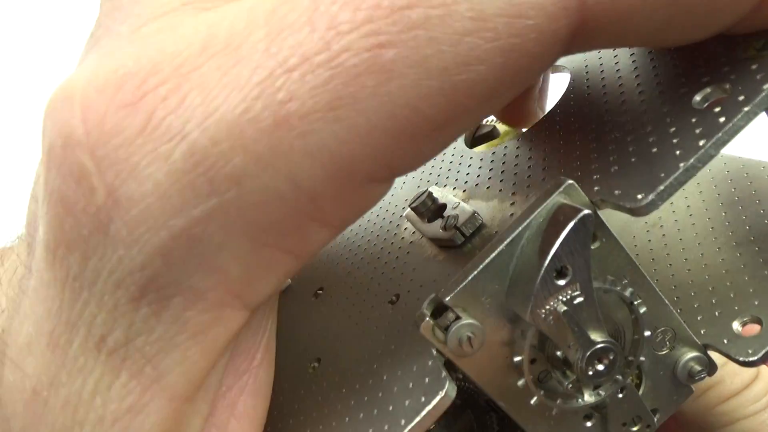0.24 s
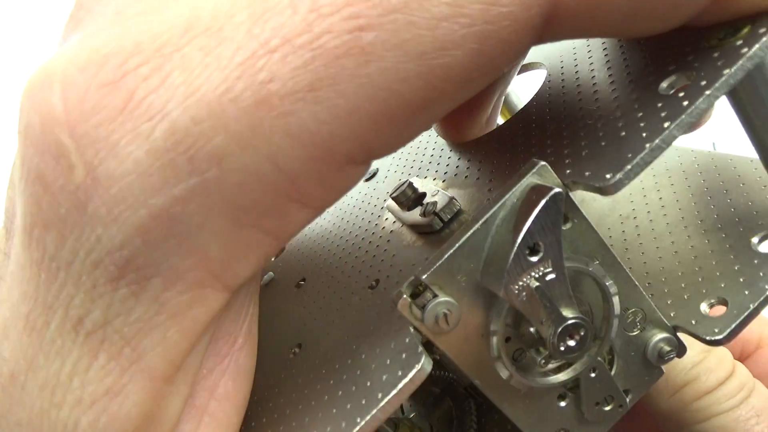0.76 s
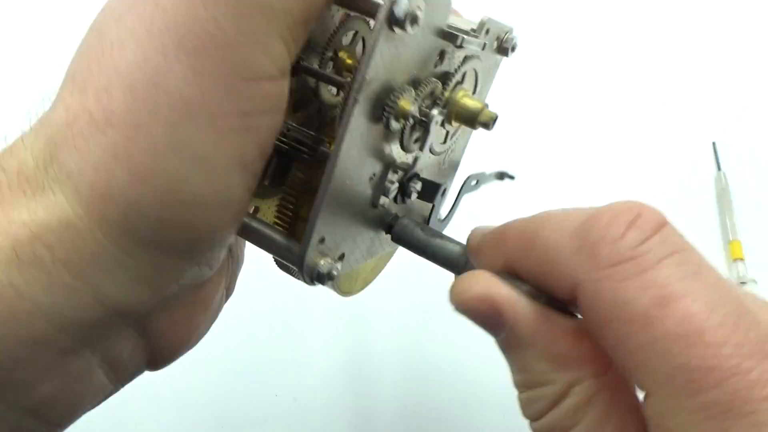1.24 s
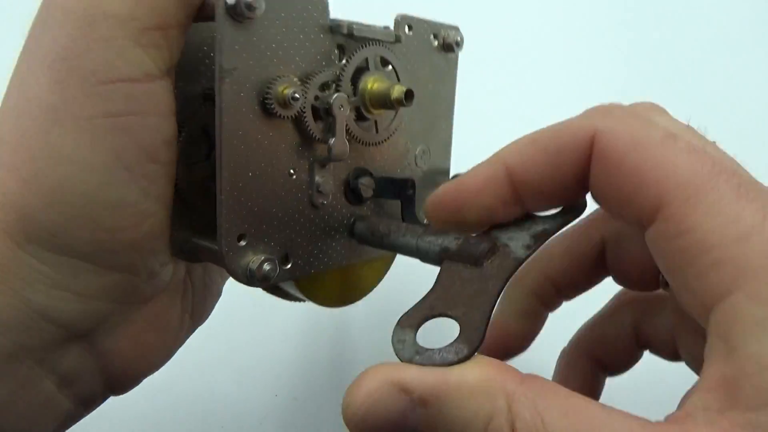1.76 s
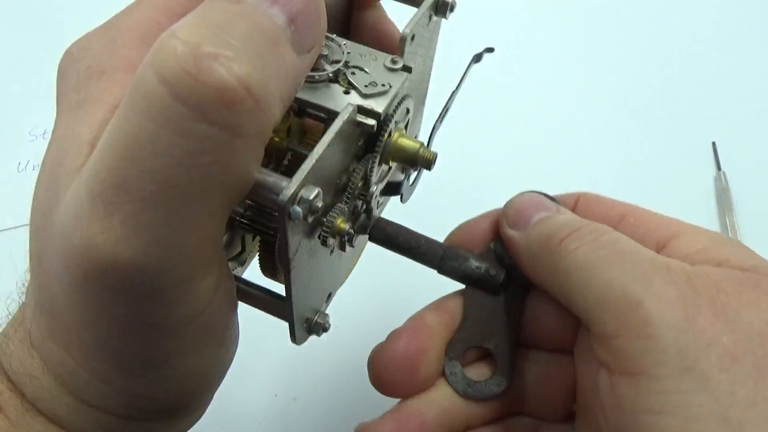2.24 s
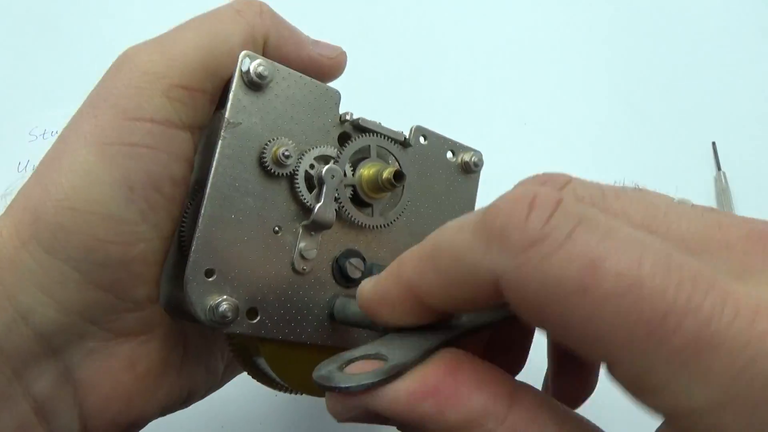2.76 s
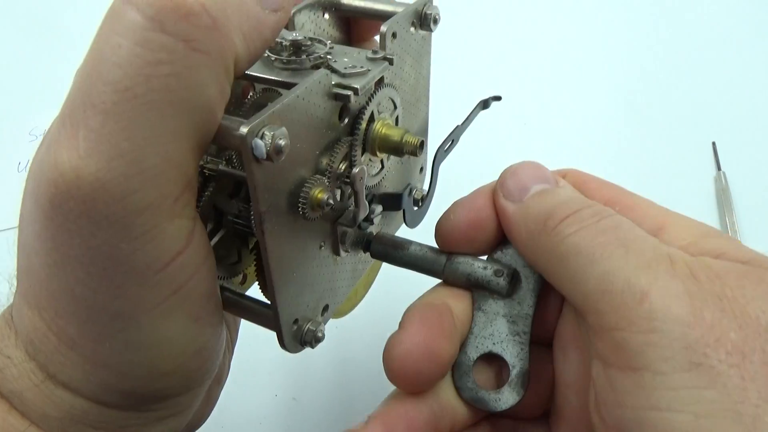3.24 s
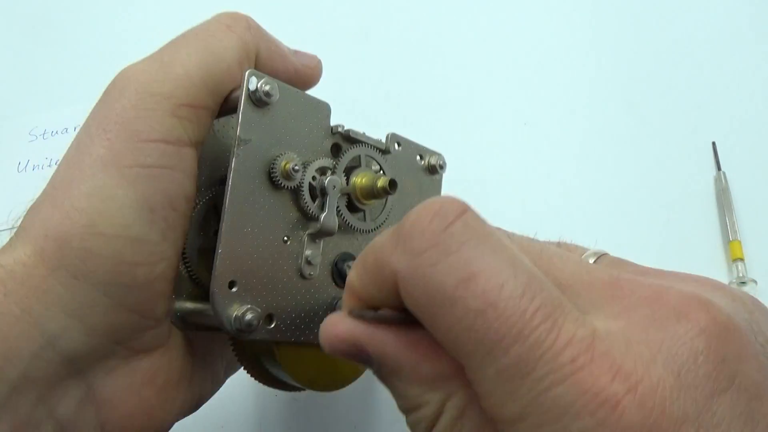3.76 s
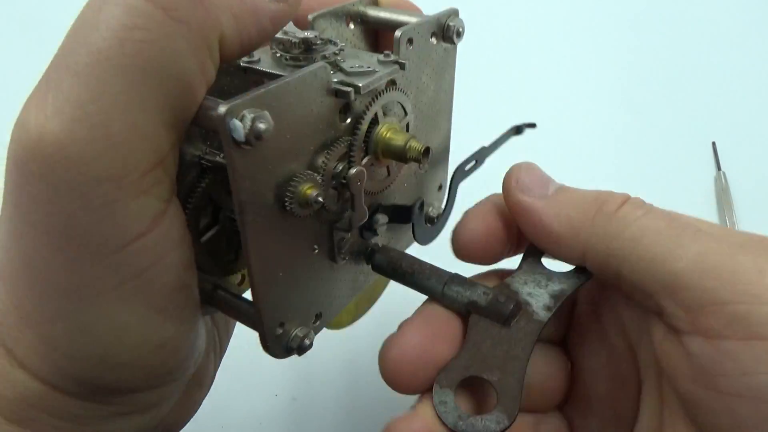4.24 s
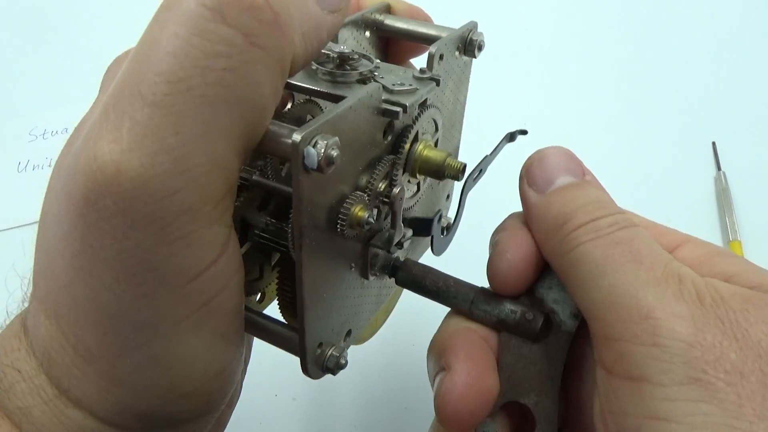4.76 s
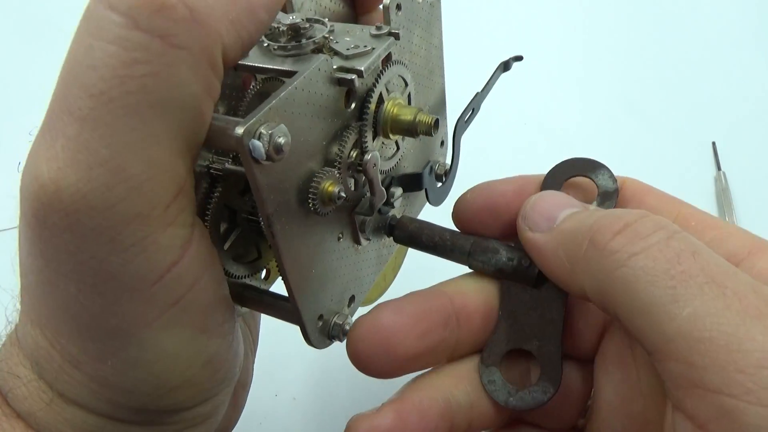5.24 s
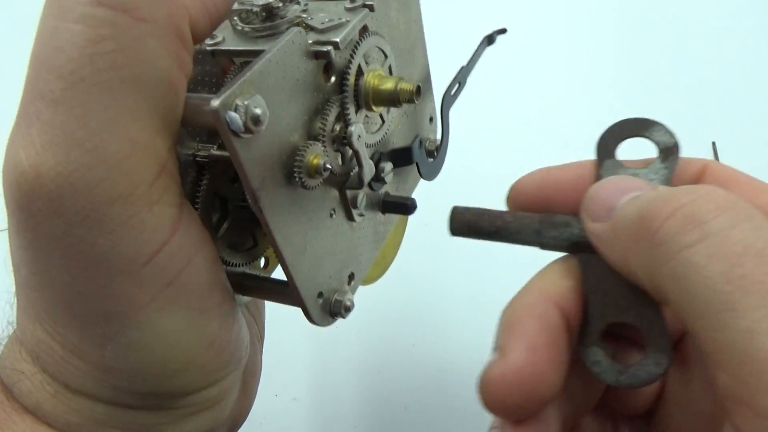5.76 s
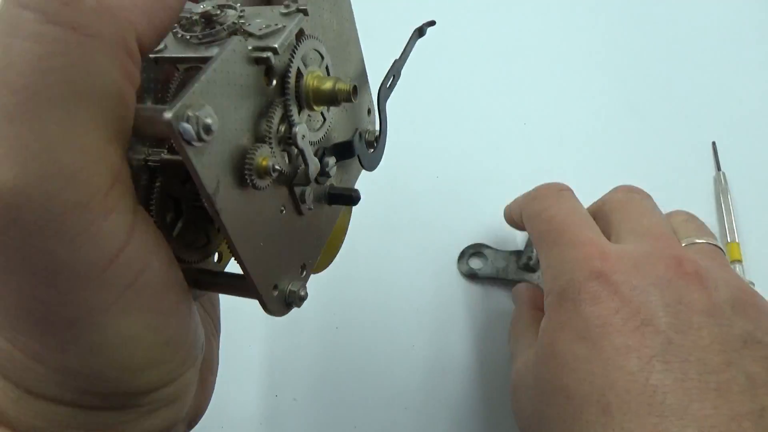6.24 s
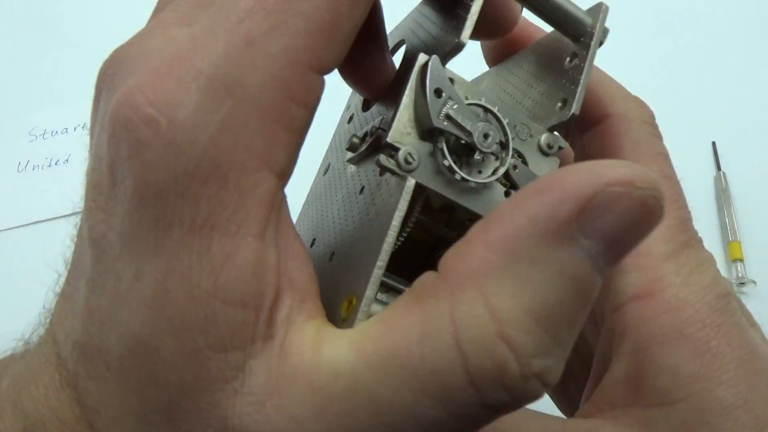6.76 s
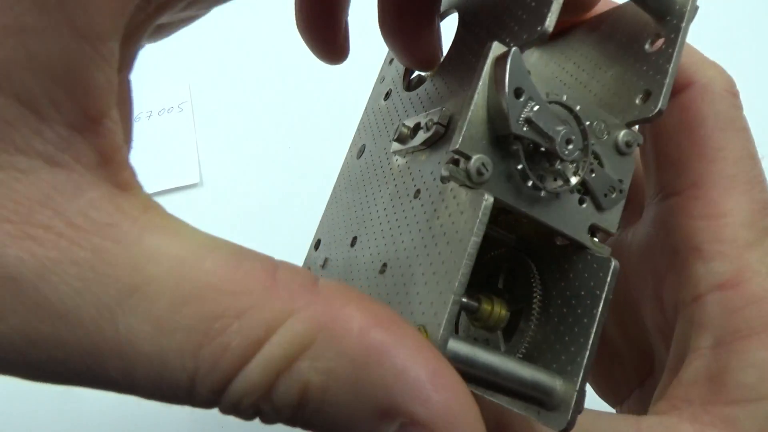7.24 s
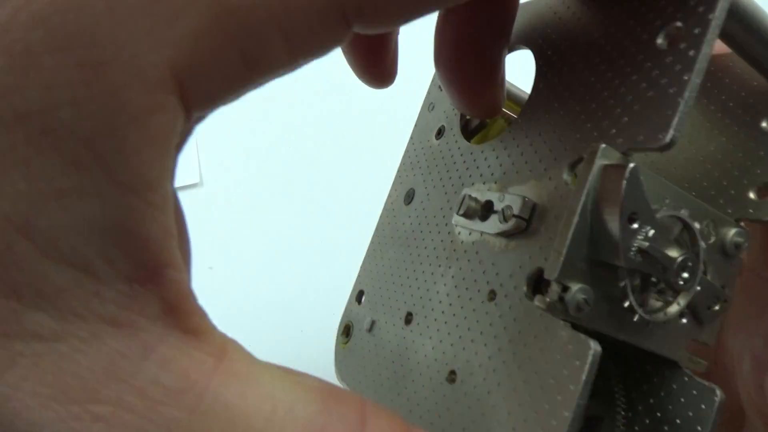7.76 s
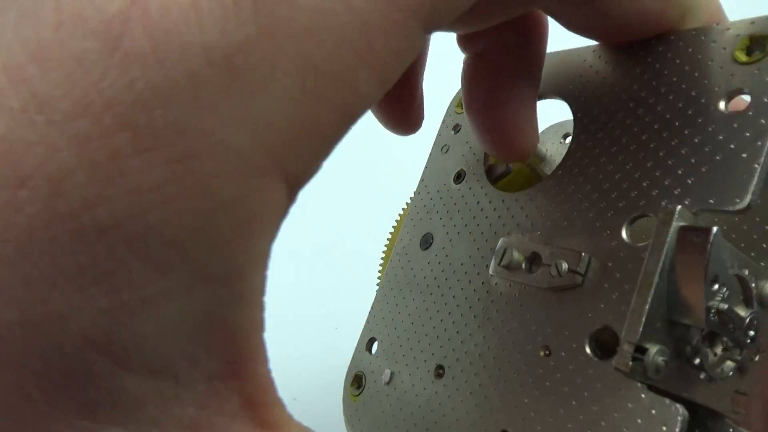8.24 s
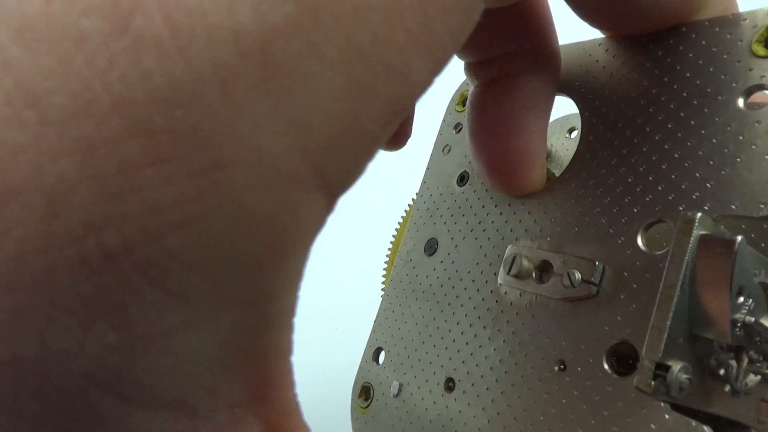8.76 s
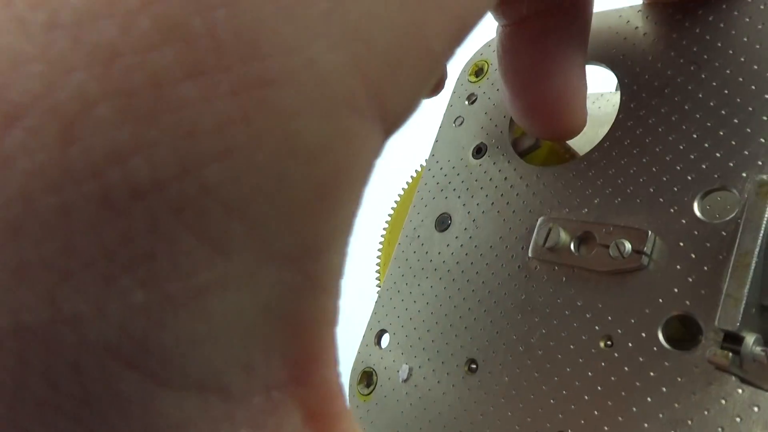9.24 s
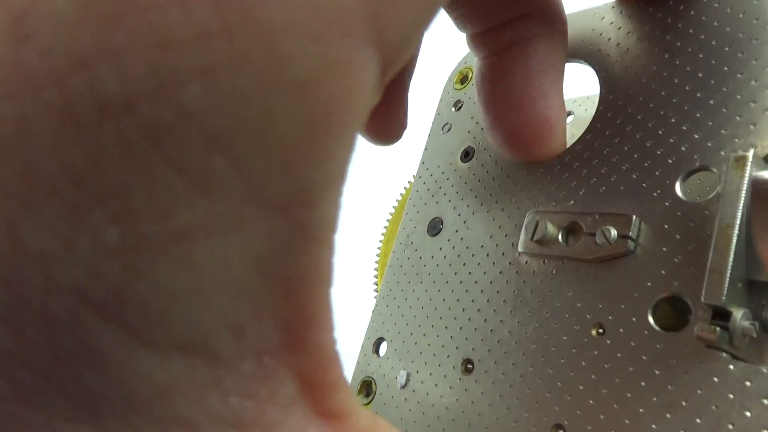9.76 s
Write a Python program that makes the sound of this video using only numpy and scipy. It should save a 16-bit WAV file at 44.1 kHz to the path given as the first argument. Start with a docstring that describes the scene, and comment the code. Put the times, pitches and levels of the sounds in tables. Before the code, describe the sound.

A small quiet room with soft hiss, faint hum and deep rumble; a spring-driven clock movement is held very close. From 0 to 4.9 s it ticks lightly and evenly, about five times a second. Five crisp ratchet clicks come between 0.1 and 0.7 s, with dull hand thuds. From 0.9 s fingers rub the plates; single ratchet clicks fall at 1.5, 2.0, 2.2 and 2.6, amid small irregular clicks, with sharper ones at 3.4. Strong snaps with a slight metallic ring occur at 4.35 to 4.7, then ratchet clicks every 0.15 s or so until 5.9. At 6.1 the key touches and drags on the wooden desk, landing with a loud double knock at 6.3, rattle and bright clinks dying away. A click at 6.6, a thin squeak at 6.9 and a click at 7.05 follow. After 8 s a low hum rises under sparse faint clicks, near 8.6, 9.0, 9.7 and 9.9.

```python
"""In a small quiet room that hums, hisses and rumbles, a spring-driven clock movement is held close to
the microphone. It ticks evenly for almost five seconds while ratchet and key click on the plates, hands
thud and fingers rub: bursts of noise in three bands, plate modes and a wash of dense modes.
After six seconds the key drags and knocks on a wooden desk, heard as ringing modes, rattle and clinks.
A finger squeaks near seven seconds; a few late clicks follow, and a low hum comes up after eight."""
import sys
import numpy as np
from scipy import signal
from scipy.fft import rfft, irfft
from scipy.io import wavfile
from scipy.ndimage import uniform_filter1d

SR = 44100
rng = np.random.default_rng(int(sys.argv[2]) if len(sys.argv) > 2 else 0)


def dump_mix(stems):
    """Bounce the given channels to the path in sys.argv[1] as a 16-bit WAV at rate SR."""
    frames = np.atleast_2d(stems).T  # one column per channel
    limited = np.clip(frames, -1, 1)  # hard clip at full scale
    pcm = np.round(limited * 32767).astype(np.int16)
    wavfile.write(sys.argv[1], SR, pcm)


N = 441000

# the ratchet pawl rides up a tooth and drops; band levels are relative, before the mix:
# drop_s [s], treble_db [dB], middle_db [dB], low_db [dB], chatter_ms [ms], ride_ms [ms],
# ride_below_drop_db [dB]
PAWL_DROPS = [(0.0797, -21, -30.5, -30.5, 2.7, 15, -29), (0.2222, -13, -22, -31, 1.3, 35.3, -14.5),
              (0.3621, -17.5, -27.5, -30.5, 2.2, 34.7, -13), (0.5297, -12, -14, -26, 0.83, 28.4, -21.5),
              (0.6774, -13.5, -22.5, -29.5, 1.3, 44, -25.5), (1.4907, -12, -19.5, -34.5, 2.1, 26, -25.5),
              (1.954, -12.5, -31, -20.5, 2.4, 40, -20), (2.2243, -23.5, -33, -35, 7.5, 39, -12.5),
              (2.6143, -17.5, -27, -42, 1.2, 52, -26), (4.2154, -21, -29, -36.5, 3.2, 8.3, -23.5),
              (4.5016, -17.5, -25, -29, 5.8, 48, -25.5), (4.6911, -11, -13, -21, 4.9, 14, -28),
              (4.8953, -14, -22, -32.5, 4.9, 24.7, -20.5), (5.0328, -19.5, -28.5, -27.5, 2.1, 24.7, -15.5),
              (5.2089, -17.5, -27, -36.5, 3.4, 28, -15.5), (5.3462, -16, -26.5, -31, 6.2, 29, -19.5),
              (5.5275, -18, -22, -53, 5.4, 26, -10.5), (5.6637, -10, -23, -30, 4.2, 22, -23.5),
              (5.7635, -28.5, -44, -36.5, 2.8, 30, -6.5), (5.8735, -15.5, -30, -34.5, 3.6, 27, -18),
              (8.6378, -22.5, -31, -30.5, 3.9, 28.4, -19), (9.6984, -23.5, -26, -33.5, 2.7, 25, -30)]


def amp(db):
    """dB to gain."""
    return 10 ** (np.asarray(db) / 20)


def in_time(rows):
    """Columns of a curve, drawn straight between its points, one value a sample."""
    s, *columns = np.transpose(rows)
    return [np.interp(np.arange(N) / SR, s, column) for column in columns]


def filtered(x, order, hz, kind):
    """Butterworth filter along the last axis."""
    return signal.sosfilt(signal.butter(order, hz, kind, fs=SR, output="sos"), x)


def band(x, lo_hz, hi_hz):
    """Band-pass that keeps the rms of white noise near 1."""
    return filtered(x + 1e-18, 2, [lo_hz, hi_hz], "band") / np.sqrt(2 * (hi_hz - lo_hz) / SR)


def coloured(x, spectrum):
    """Shape noise by a spectrum drawn over log frequency; overall rms 1."""
    hz, db = np.transpose(spectrum)
    bins_hz = np.arange(x.shape[-1] // 2 + 1) * SR / x.shape[-1] + 1
    gain = amp(np.interp(np.log(bins_hz), np.log(hz), db))
    out = irfft(rfft(x) * gain, x.shape[-1])
    return out / np.sqrt(np.mean(out ** 2))


def ring(x, modes):
    """Each mode is a two-pole resonator set ringing by x at its level; signs alternate."""
    out = 0
    for k, (hz, db, t60_s) in enumerate(modes):
        r = amp(-60 / (t60_s * SR))
        w = 2 * np.pi * hz / SR
        mode = signal.lfilter([0, amp(db) * np.sin(w)], [1, -2 * r * np.cos(w), r * r], x + 1e-18)
        out = out + (-1) ** k * mode
    return out


def dying(x, t60_s):
    """Countless echoes: x through decaying noise of energy 1, different on each side."""
    fall = amp(-60 * np.arange(int(SR * .8)) / SR / t60_s)
    tail = rng.standard_normal((2, len(fall))) * fall / np.sqrt(np.sum(fall ** 2))
    return signal.fftconvolve(x * np.ones((2, 1)), tail, axes=1)[:, :N]


def taps(rows):
    """A single-sample click for each (s, dB)."""
    out = np.zeros(N)
    for s, db in rows:
        out[int(s * SR)] += amp(db)
    return out


def widen(mid, side):
    """Left and right from a centre and a side signal."""
    return mid + side * [[1], [-1]]


def stroke(start_s, end_s, band_db, ease):
    """Force of one sliding contact in three bands; ease is the share spent starting and stopping."""
    a, b = int(start_s * SR), int(end_s * SR)
    out = np.zeros((3, N))
    out[:, a:b] = amp(band_db)[:, None] * signal.windows.tukey(b - a, ease)
    return out


def room_hiss():
    """Room and microphone hiss: noise shaped by a spectrum, with a band-limited side signal."""
    # hiss spectrum: frequency_hz [Hz], density_db [dB per Hz, relative]
    hiss_spectrum = [(15, -49), (25, -14.5), (58, -18), (87, -19), (149, -5.5), (242, -9), (293, -11),
                     (734, -13), (1370, -14.5), (1890, -20), (16000, -27.5)]
    mid, side = coloured(rng.standard_normal((2, N)), hiss_spectrum)
    side = filtered(side, 1, [150, 9000], "band")
    return amp(-61.5) * widen(mid, amp(-4.5) * side)


def distant_hum():
    """Distant machines: narrow bands of noise, which waver by themselves."""
    # hums: centre_hz [Hz], width_hz [Hz], level_db [dB]
    hums = [(118.8, 5.6, -68.5), (203.2, 5.7, -73.5), (306, 14, -76), (1380, 9.2, -80)]
    out = 0
    for hz, width_hz, db in hums:
        out = out + amp(db) * band(rng.standard_normal(N), hz - width_hz / 2, hz + width_hz / 2)
    return out


def rumble():
    """Deep rumble through desk and stand: low noise, band-passed twice, under a level curve."""
    # rumble level before the rescaling below: time_s [s], level_db [dB]
    rumble_curve = [(0.0, -66.5), (0.11, -69), (3.54, -61.5), (3.73, -69.5), (4.84, -62.5), (5.85, -68),
                    (6.15, -49.5), (6.71, -63.5), (7.38, -80), (7.58, -57.5), (8.36, -77), (10.0, -73.5)]
    level_db, = in_time(rumble_curve)
    low = band(band(rng.standard_normal(N), 39, 63), 30.6, 68.7)
    return amp(level_db) * low * np.sqrt(60 / SR)    # takes back most of the second band's gain


def escapement():
    """Rows of clicks: an even beat with slight jitter, each tick led by a softer unlocking."""
    # tick loudness as the movement is turned about: time_s [s], treble_db [dB, relative]
    tick_curve = [(0, -20.5), (.82, -22.5), (1.22, -26), (1.82, -25), (2.02, -21.5), (2.82, -28),
                  (4.42, -27), (4.82, -50)]
    beat_s, first_s, last_s, jitter_s = .2001, .0216, 4.9, .0007
    unlock_lead_s, unlock_db, spread_db = .0165, -12, 3.5
    s = np.arange(first_s, last_s, beat_s)
    chance = rng.standard_normal((len(s), 3))
    s = s + jitter_s * chance[:, 0]
    level_db = np.interp(s, *np.transpose(tick_curve))
    tick = level_db + spread_db * chance[:, 1]
    unlock = level_db + unlock_db + spread_db * chance[:, 2]
    chatter_ms = np.full(len(s), 0.53)
    # middle and low bands lie below the treble
    ticks = zip(s, tick, tick - 11.5, tick - 18, chatter_ms)
    unlocks = zip(s - unlock_lead_s, unlock, unlock - 6, unlock - 16, chatter_ms)
    return list(ticks) + list(unlocks)


def faint_patter():
    """A faint regular patter near 3 kHz, 25 short noise puffs a second."""
    at = (np.arange(.032, N / SR, 1 / 25) * SR).astype(int)
    puffs = np.zeros(N)
    puffs[at] = amp(-65.0 + 0.91 * rng.standard_normal(len(at)))
    envelope = np.convolve(puffs, np.hanning(400))[:N]
    return band(envelope * rng.standard_normal(N), 2600, 3600)


def clicks(roughness):
    """Force of the clicks: a sharp first strike, then bounces that build and die away."""
    # key, fingers and parts strike the plates, levels relative:
    # start_s [s], treble_db [dB], middle_db [dB], low_db [dB], chatter_ms [ms]
    plate_clicks = [(0.0335, -35, -31, -33.5, 3.9), (0.0435, -29, -41, -38, 2.7),
                    (0.0714, -36, -45, -37, 1.7), (0.482, -40.5, -37.5, -50, 1),
                    (1.1253, -45, -64, -54, 1.8), (1.2979, -43, -65, -66, 1.1),
                    (1.3479, -31.5, -35.5, -51, 1.5), (1.9341, -39, -29, -24.5, 3.6),
                    (2.0527, -33.5, -44, -33.5, 4.2), (2.1874, -23.5, -31, -42, 2),
                    (2.3034, -33, -48, -55, 2.3), (2.3152, -19.5, -34, -41.5, 3),
                    (2.366, -29, -61, -66, 2.1), (2.4484, -22.5, -28.5, -46, 2.1),
                    (2.4564, -26, -27.5, -54, 2.8), (2.5186, -61, -29.5, -55, 3.8),
                    (2.5987, -26, -31, -44, 1.2), (2.646, -21, -24.5, -38.5, 2),
                    (3.0914, -40, -49, -30.5, 4.2), (3.1117, -31, -29.5, -38, 2.1),
                    (3.1935, -39, -40.5, -39, 6), (3.4221, -12.5, -26, -32.5, 5.8),
                    (3.4826, -30, -34, -40, 3.6), (3.4953, -18.5, -29.5, -29, 3.5),
                    (3.6652, -32.5, -29, -46, 9), (3.7224, -52, -34, -42, 1.7), (3.768, -31, -34, -55, 2.2),
                    (3.7813, -29, -45, -53, 3), (3.7954, -34, -45, -55, 1.8),
                    (3.8561, -43, -30.5, -43, 2.5), (4.1844, -45, -37, -43, 2.4),
                    (4.2061, -21.5, -42, -37, 2.1), (4.2844, -49, -52, -39.5, 2),
                    (4.3203, -33.5, -50, -39.5, 1.3), (4.354, -11, -23, -31, 3.4),
                    (4.587, -7, -17.5, -21.5, 1.9), (4.9773, -28, -28, -42, 5),
                    (5.016, -41, -61, -42.5, 1.2), (5.0981, -36, -41, -48, 3.3),
                    (5.1089, -20, -25.5, -38, 2.7), (5.2015, -18.5, -23.5, -45.5, 3),
                    (5.475, -48, -45, -44, 1.4), (5.5192, -13.5, -29, -42.5, 3),
                    (5.7536, -24, -25, -41, 8.3), (5.8457, -36, -43, -40.5, 4.8),
                    (5.911, -28.5, -41, -36.5, 4.2), (6.0854, -44, -57, -30, 4.3),
                    (6.2175, -25, -24.5, -35, 2.5), (6.2555, -31, -30, -29.5, 1.8),
                    (6.589, -12.5, -16.5, -23, 6.9), (7.0595, -11.5, -21.5, -27.5, 4.8),
                    (7.2002, -31, -35, -46, 3.3), (7.39, -33.5, -39, -43, 3.2),
                    (8.5792, -46, -60, -40.5, 2.5), (8.6168, -45, -36, -41, 2.2),
                    (8.8962, -40, -40, -50, 3), (8.9338, -40, -46.5, -58, 3), (9.0448, -25, -27.5, -46, 2),
                    (9.061, -38, -39.5, -50, 3.2), (9.6594, -38.5, -48.5, -44, 4.1),
                    (9.6816, -40, -44, -35, 1.6), (9.9186, -20, -21, -39, 2.6),
                    (9.9365, -26, -49, -51, 1.9), (9.9496, -39, -41, -55, 3.2)]
    strike_height, strike_width_s, build_share, bounce_db = 1.83, 0.00016, 0.28, 2.5
    force = np.zeros((3, N))
    lead = int(.003 * SR)                            # room for the build-up before each click
    t = (np.arange(int(.06 * SR)) - lead) / SR
    strike = strike_height * np.exp(-((t - .0004) / strike_width_s) ** 2)
    pawl_drops = [row[:5] for row in PAWL_DROPS]
    for s, *band_db, chatter_ms in escapement() + list(plate_clicks) + pawl_drops:
        chatter_s = chatter_ms / 1000
        bounces = np.exp(np.minimum(t / (build_share * chatter_s), -t / chatter_s))
        at = max(int(s * SR) - lead, 0)
        uneven = amp(bounce_db * roughness[at:at + len(t)])
        shape = bounces[:N - at] * uneven + strike[:N - at]
        force[:, at:at + len(t)] += amp(band_db)[:, None] * shape
    return force


def pawl_rides():
    """Force of the pawl sliding up each tooth until it drops."""
    force = np.zeros((3, N))
    for s, *band_db, chatter_ms, ride_ms, ride_db in PAWL_DROPS:
        force += stroke(s - ride_ms / 1000, s, np.add(band_db, ride_db), ease=0.67)
    return force


def rubbing():
    """Force of fingers and key sliding on the plates."""
    # strokes, levels relative; the low band lies 4 dB under the middle:
    # start_s [s], end_s [s], treble_db [dB], middle_db [dB]
    rubs = [(0.923, 1.218, -50, -58.5), (1.258, 1.48, -49.5, -53.5), (1.729, 1.802, -50, -54),
            (1.857, 2.24, -53.5, -57.5), (2.278, 2.71, -48.5, -50), (2.902, 3.019, -49, -54.5),
            (3.032, 3.264, -46, -52.5), (3.546, 3.893, -44, -46.5), (4.028, 4.121, -48.5, -56),
            (4.116, 4.52, -49, -51), (4.7, 4.865, -50, -65.5), (6.092, 6.135, -45.5, -44.5),
            (6.253, 6.313, -35.5, -34.5), (6.61, 7.1, -58, -65.5), (7.27, 7.309, -58, -64),
            (8.874, 8.96, -51, -54), (9.588, 9.68, -59, -63), (9.901, 9.94, -40, -44)]
    force = np.zeros((3, N))
    for start_s, end_s, treble_db, middle_db in rubs:
        force += stroke(start_s, end_s, [treble_db, middle_db, middle_db - 4], ease=0.41)
    return force


def snags(sliding):
    """Sliding surfaces catch at random instants; each catch lets go exponentially."""
    snags_per_s, level_db, colour_db, decay_ms = 90, 3, 6, 1.6
    caught = rng.random(N) < snags_per_s / SR        # all bands catch together
    strength = amp(level_db + colour_db * rng.standard_normal((3, N)))
    decay = np.exp(-1000 / (decay_ms * SR))
    return signal.lfilter([1], [1, -decay], caught * strength * sliding + 1e-18)


def contacts():
    """Strength of contact in the treble, middle and low band: gritty sliding, snags and clicks."""
    sliding = rubbing() + pawl_rides()
    fine = uniform_filter1d(rng.standard_normal(N), size=40) * np.sqrt(40)
    coarse = uniform_filter1d(rng.standard_normal((3, N)), size=500) * np.sqrt(500)
    grit = amp(4.0 * fine + 3.1 * coarse)            # uneven surfaces
    gritty = sliding * grit / np.sqrt(np.mean(grit ** 2))
    return gritty + snags(sliding) + clicks(fine)


def in_bands(force):
    """Fresh noise for centre and side under each band's force; the low band leaks into the frame."""
    white = rng.choice([-1., 1.], (3, 2, N)) * force[:, None]
    treble = band(white[0], 7200, 12600)
    middle = band(white[1], 3200, 6300)
    low = band(white[2], 1500, 3000)
    frame = amp(-12.5) * band(white[2], 350, 942)
    return treble + middle + low + frame


def held_plates(hit):
    """The grip shifts all the time, so each plate mode is fed with a wandering strength of its own."""
    # plate modes: frequency_hz [Hz], level_db [dB, relative], t60_s [s]
    plate_modes = [(1683, -2.5, 0.062), (2065, 0, 0.023), (2366, 1, 0.014), (3500, -15.5, 0.031),
                   (3934, -16.5, 0.053), (4335, -6.5, 0.049), (4802, 3, .025), (5260, -2, 0.02),
                   (6334, -2, 0.028), (6766, 1.5, 0.012), (8000, -16, .05), (8480, 0, 0.046),
                   (8660, 0, 0.03), (9300, -7, 0.025), (9530, 2.5, 0.033), (10270, -2, 0.015),
                   (10620, 1.5, 0.02), (11600, -9.5, 0.011), (12500, -10.5, .03), (13300, -4, 0.03)]
    grip_db = 6.0
    steps = rng.standard_normal((len(plate_modes), 400))
    steps = uniform_filter1d(steps, size=2) * np.sqrt(2)
    out = 0
    for mode, step in zip(plate_modes, steps):
        wander = np.interp(np.linspace(0, 399, N), np.arange(400), step)
        out = out + ring(hit * amp(grip_db * wander), [mode])
    return out


def dense_modes(force):
    """A wash of close modes: noise under stored contact energy that leaks out."""
    t60_s = 0.11
    r = amp(-120 / (t60_s * SR))                     # loss of energy per sample
    energy = signal.lfilter([1 - r], [1, -r], force ** 2 + 1e-18)
    return in_bands(np.sqrt(energy))


def thuds():
    """Dull thuds of the hands and the spring barrel: flesh makes a blunt blow on low modes."""
    # thuds: time_s [s], blow_db [dB, relative]
    thud_blows = [(0.081, -37), (0.361, -32.5), (0.677, -33.5), (1.931, -29.5), (1.952, -32.5),
                  (2.049, -35.5), (2.226, -42.5), (3.093, -35.5), (4.215, -33.5), (4.284, -37),
                  (4.503, -31), (4.586, -41), (4.69, -39), (5.344, -42), (8.636, -36), (9.695, -35.5)]
    # modes of the held movement: frequency_hz [Hz], level_db [dB, relative], t60_s [s]
    hand_modes = [(125.5, -9.5, 0.08), (231, -4, 0.032), (367, -1.5, 0.011), (709.4, -1, 0.0057),
                  (1050, 2, 0.008)]
    blunt = np.convolve(taps(thud_blows), np.hanning(24) / 12)[:N]
    return amp(-1.5) * ring(blunt, hand_modes)


def ringing_key():
    """Blows leave the key ringing in the modes of its shaft and its bow."""
    # blows: time_s [s], shaft_db [dB, relative], bow_db [dB, relative]
    key_blows = [(4.504, -83, -40), (4.585, -37.5, -41), (4.687, -46, -36), (5.107, -52, -60),
                 (5.906, -48, -65), (7.198, -59, -56), (7.391, -59, -58)]
    # shaft modes: frequency_hz [Hz], level_db [dB, relative], t60_s [s]
    shaft_modes = [(7305, -5, .55), (7322, -12, .3), (12750, -6, .3), (12725, -12, .25)]
    # bow modes: frequency_hz [Hz], level_db [dB, relative], t60_s [s]
    bow_modes = [(1715, -1, .18), (1680, -6, .15), (3623, -9, .4), (9100, -9, .45)]
    s, shaft_db, bow_db = np.transpose(key_blows)
    return ring(taps(zip(s, shaft_db)), shaft_modes) + ring(taps(zip(s, bow_db)), bow_modes)


def key_drag():
    """The key drags on the desk before it is let go: band noise under a level curve."""
    # level of each noise band: time_s [s], level_db [dB]
    drag_curve = [(6.08, -71), (6.09, -54), (6.14, -49), (6.17, -48.5), (6.25, -55), (6.3, -45),
                  (6.31, -74.5)]
    level_db, = in_time(drag_curve)
    scratch = rng.standard_normal(N) * (level_db > drag_curve[0][1])     # silent outside the drag
    return amp(level_db) * (band(scratch, 777, 985) + band(scratch, 1300, 3200))


def desk():
    """Each landing rings the desk top and sets off a dull rattle that dies; the key adds a short clink."""
    # the key lands and rocks: time_s [s], knock_db [dB, relative], clink_db [dB]
    knocks = [(6.082, -41, -48), (6.219, -41, -46), (6.309, -15, -35), (6.32, -10, -33.5),
              (6.364, -13.5, -28.5), (6.375, -52, -77), (6.395, -47, -28.5), (6.406, -42, -45)]
    # desk top modes: frequency_hz [Hz], level_db [dB, relative], t60_s [s]
    desk_modes = [(126, -4, .45), (228, 3, .5), (443, -3, .3), (581, -2, .32), (654, 1, .35), (789, -1, .6),
                  (894, 0, .25), (1180, -5, .29), (1247, -3, .33), (1465, -3, .33), (1552, -3, .23),
                  (1658, -3, .22), (1766, -6, .34), (2105, -7, .4), (2449, -7, .29), (2966, -10, .39),
                  (3354, -11, .31)]
    # rattle spectrum: frequency_hz [Hz], density_db [dB per Hz, relative]
    rattle_spectrum = [(35, -61.5), (60, -40), (90, -11), (123, -29), (174, -14), (219, 6.5), (276, -8),
                       (663, -4.5), (960, 0.5), (9450, -12.5), (15000, -48)]
    s, knock_db, clink_db = np.transpose(knocks)
    blows = taps(zip(s, knock_db))
    t = np.arange(int(.6 * SR)) / SR
    body = filtered(coloured(rng.standard_normal((2, len(t))), rattle_spectrum), 6, 3800, "low")
    mid, side = body * (amp(-60 * t / 0.63) + 3.9 * amp(-60 * t / 0.18))     # slow and fast decay
    side = filtered(side, 2, 300, "high")
    rattle = signal.fftconvolve(blows[None], widen(mid, 0.414 * side), axes=1)[:, :N]
    clink = band(rng.standard_normal(len(t)), 4100, 10300) * amp(-60 * t / 0.14)
    clinks = signal.fftconvolve(taps(zip(s, clink_db)), clink)[:N]
    return amp(-15.5) * rattle + amp(-20.0) * ring(blows, desk_modes) + clinks + key_drag()


def squeak():
    """A thin squeak as a finger slips: a narrow band of noise under a level curve."""
    # squeak: time_s [s], level_db [dB]
    squeak_curve = [(6.87, -95.5), (6.89, -49.5), (6.925, -65), (6.95, -69), (6.99, -66), (7.04, -55),
                    (7.06, -91)]
    level_db, = in_time(squeak_curve)
    return amp(level_db) * band(rng.standard_normal(N), 2260, 2480)


def late_hum():
    """A low hum near 150 Hz that comes up late: a narrow band of noise under a level curve."""
    # late hum: time_s [s], level_db [dB]
    late_curve = [(0, -88), (7.8, -86.5), (8.3, -68.5), (9.5, -70.5), (10, -83)]
    level_db, = in_time(late_curve)
    return amp(level_db) * band(rng.standard_normal(N), 146, 156)


def movement():
    """Contact noise heard directly, through plate modes and as a dense wash, placed left to right."""
    # where the movement is held: time_s [s], left_minus_right_db [dB]
    pan_curve = [(0.0, -0.5), (0.86, -0.5), (1.67, 0.5), (5.1, 0.5), (10.0, -2)]
    force = contacts()
    hit = in_bands(force)
    mid, side = amp(-10.5) * hit + amp(-43.0) * held_plates(hit) + amp(-13.0) * dense_modes(force)
    mid = mid + faint_patter() + thuds() + ringing_key() + squeak()
    side = filtered(side, 2, 10000, "low")
    pan_db, = in_time(pan_curve)
    return widen(mid, amp(-14.0) * side) * amp([pan_db / 2, -pan_db / 2])


def scene():
    """Movement and desk close by, their echoes off the walls of a small room, and the room's own noise."""
    near = movement() + desk()
    walls = filtered(near.mean(axis=0), 2, [300, 4500], "band")
    echoes = amp(-14.0) * dying(walls, t60_s=0.56)
    return near + echoes + room_hiss() + distant_hum() + rumble() + late_hum()


def record(dry):
    """A steep low-pass cuts the top, 60 dB down from about 16.5 kHz."""
    return signal.sosfilt(signal.cheby2(12, 60, 15900 * 1.04, fs=SR, output="sos"), dry)


dry = scene()
out = record(dry)
dump_mix(out)
```